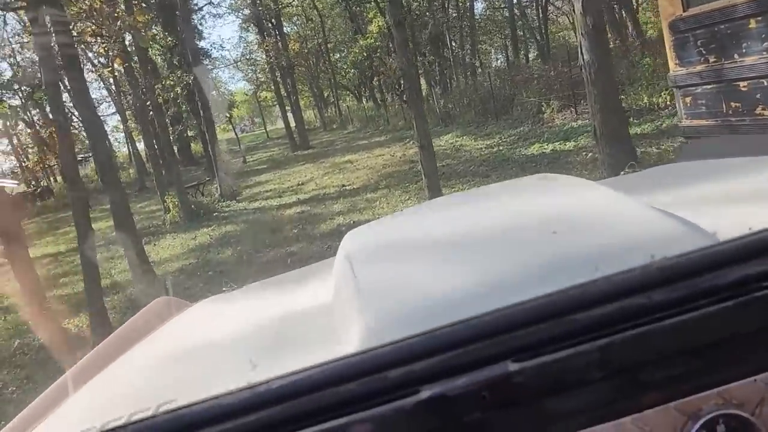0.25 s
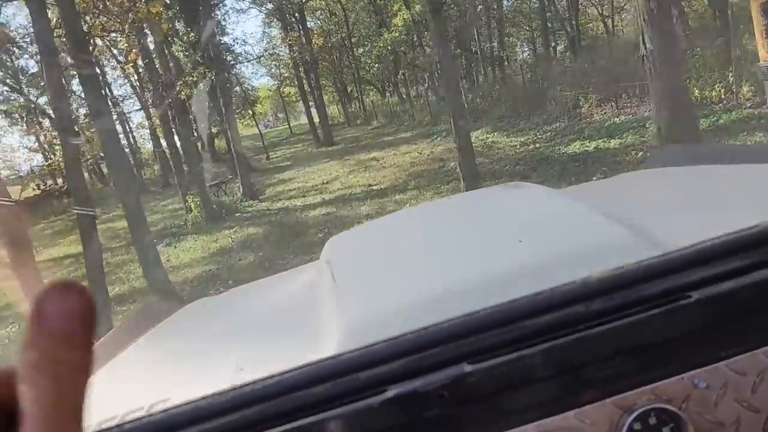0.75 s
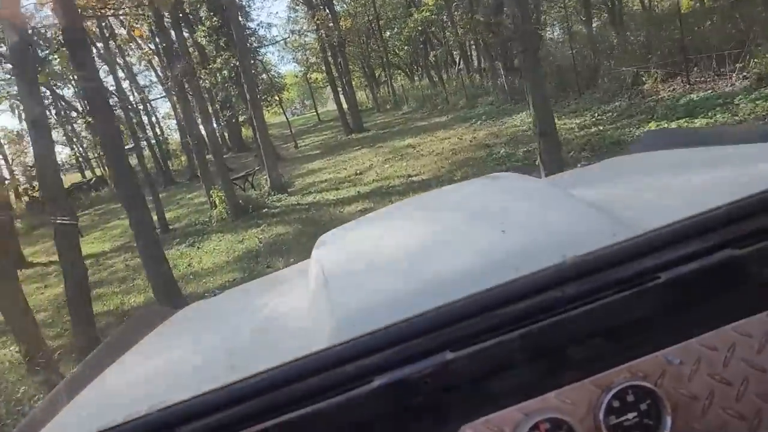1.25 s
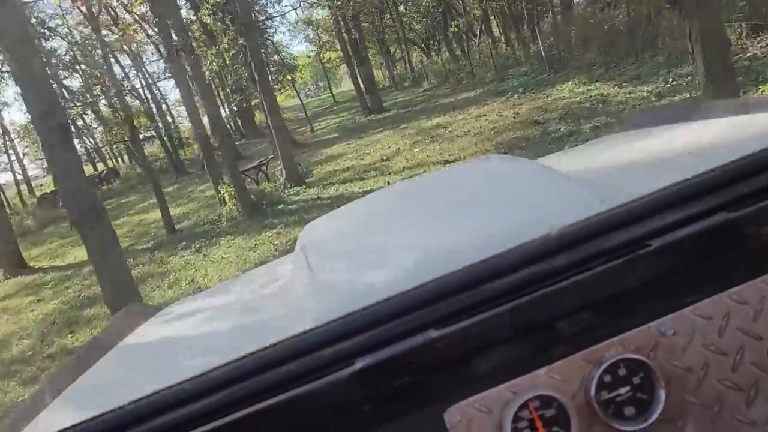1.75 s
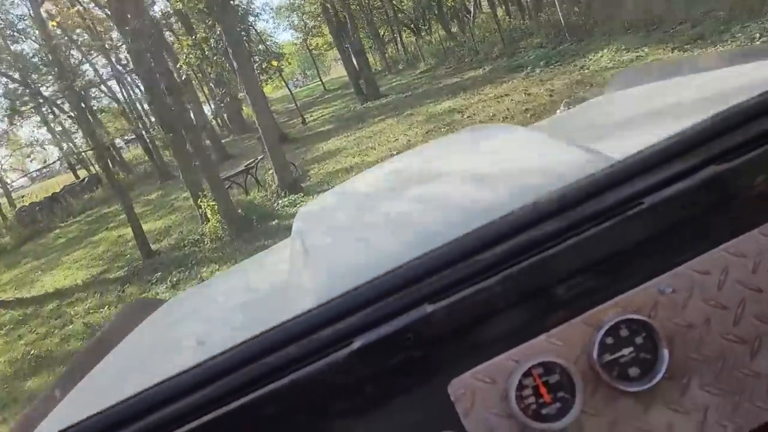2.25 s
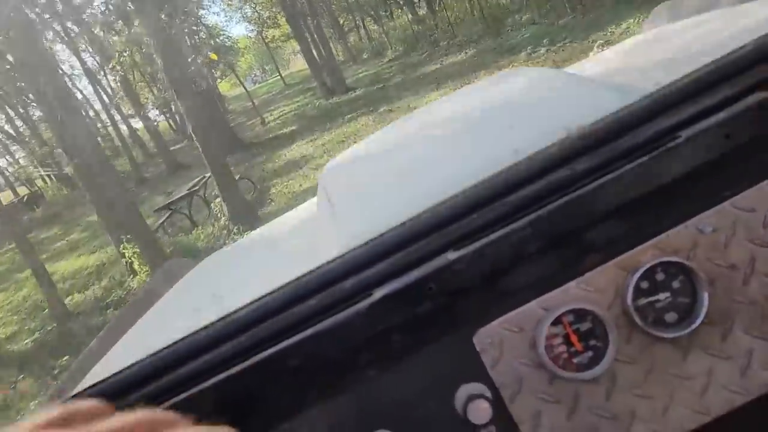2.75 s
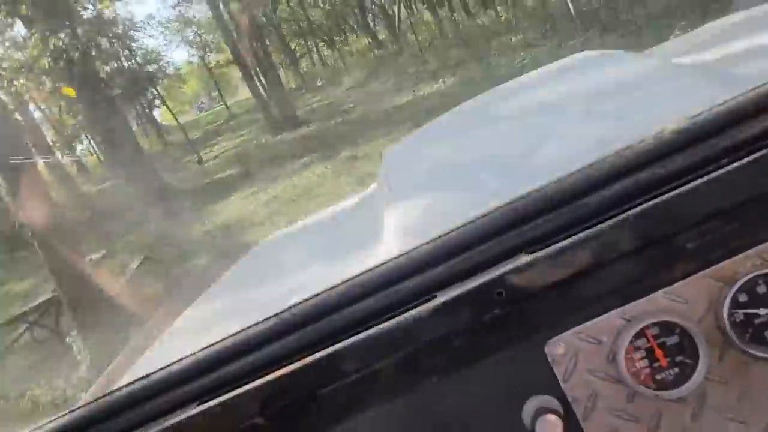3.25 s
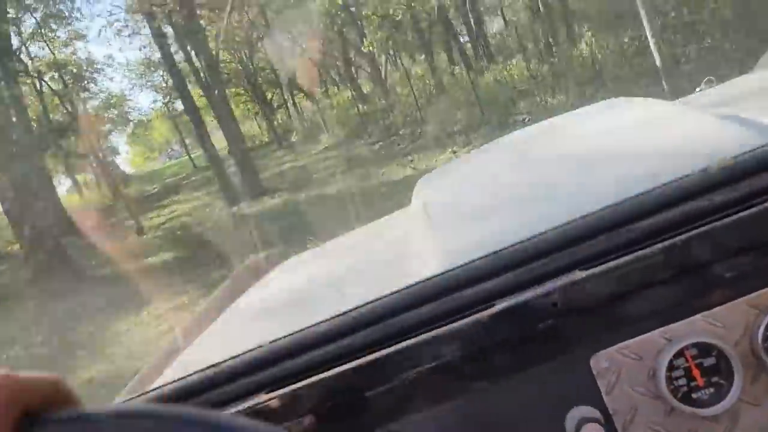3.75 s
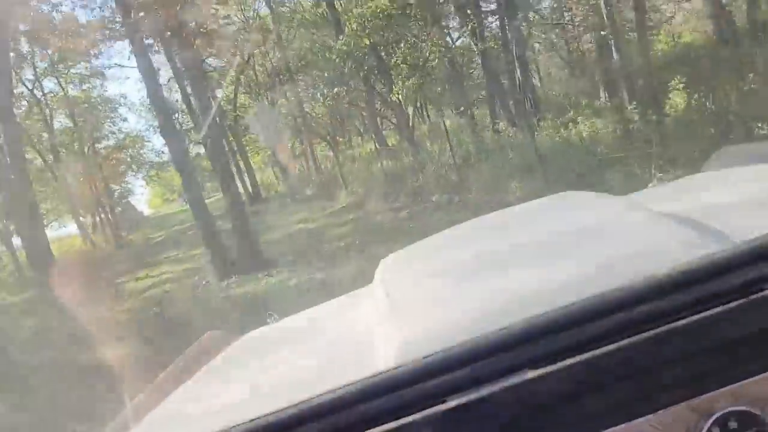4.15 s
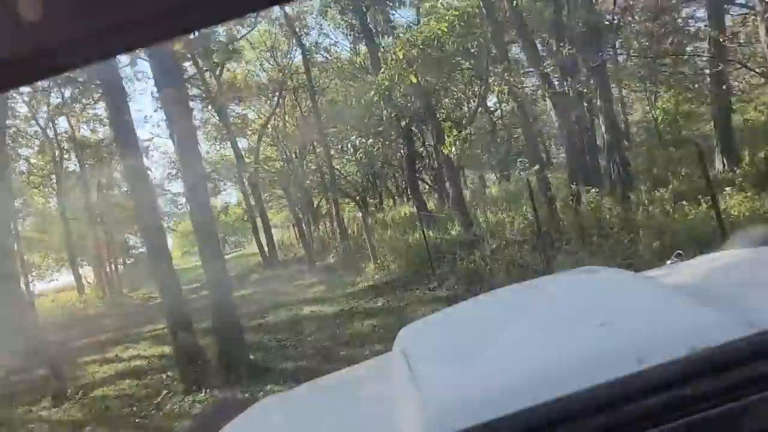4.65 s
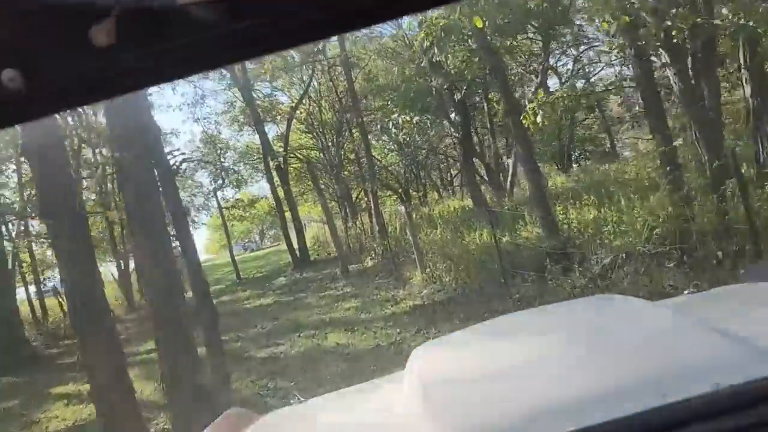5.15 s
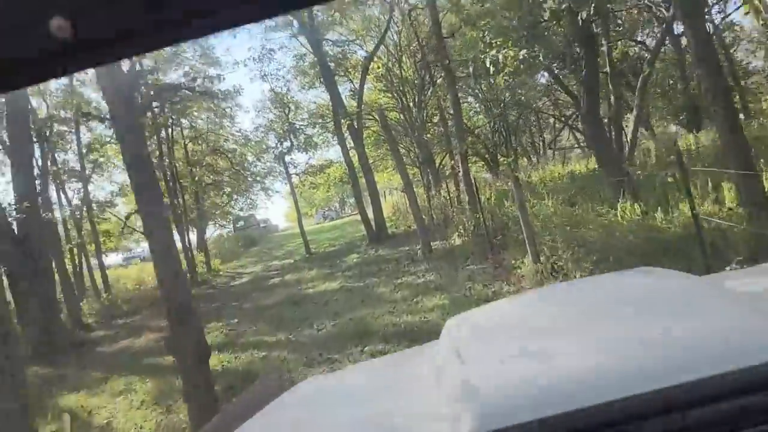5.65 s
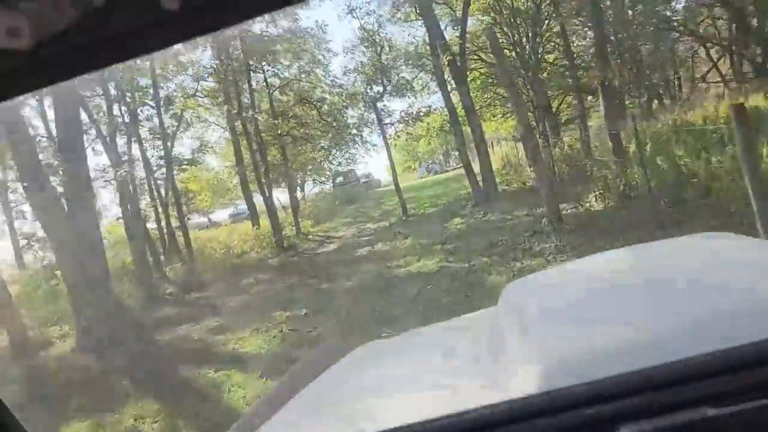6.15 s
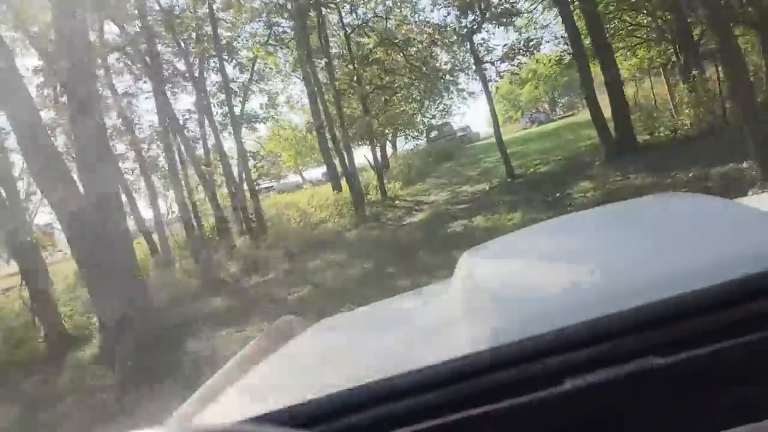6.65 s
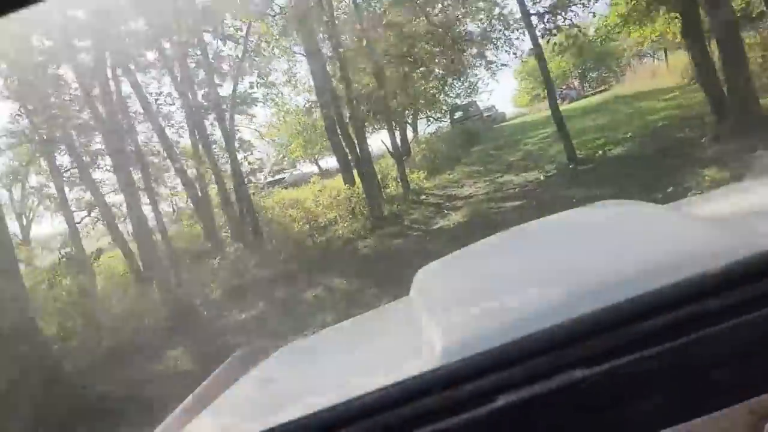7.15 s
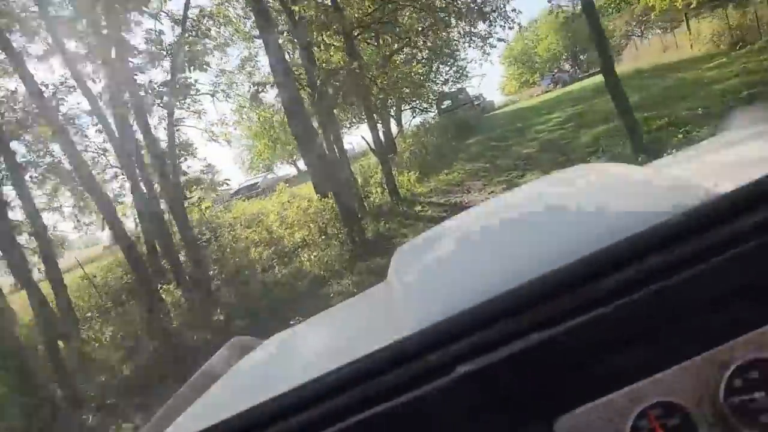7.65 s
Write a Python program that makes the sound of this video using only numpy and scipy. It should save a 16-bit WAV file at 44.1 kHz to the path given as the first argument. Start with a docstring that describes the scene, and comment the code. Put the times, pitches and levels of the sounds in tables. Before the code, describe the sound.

A V8 pickup is heard from inside the cab, crawling over rough ground. The engine rises from low revs in the first half second to a deep, steady boom with a burbling exhaust, fan hiss and light metal ticks. From about 2.4 seconds it revs harder, roaring over a bump with rumble and clatter, and peaks near 3.2 seconds. The throttle shuts at 3.4 and the pitch falls, with a brief squeaky scrape and dry snaps around 3.8. From 4 to 5.5 seconds the engine lopes and putts more quietly while panels knock and creak. At 5.5 it picks up sharply and booms under load at moderate revs until the end, near 8 seconds. Sharp knocks come around 5.9, heavier bumps and rattles between 6.2 and 6.7, and more clatter around 7.6, with a faint jingle of loose metal.

```python
"""V8 pickup on rough ground

From inside the cab, the firing tone booms and the uneven exhaust of the two banks burbles around it.
The engine bay roars and hisses with load; off throttle the engine putts. As the truck crawls along,
panels knock, snap, creak and clatter, small metal parts tick and jingle, and something scrapes once."""
import sys
import numpy as np
from scipy import signal
from scipy.fft import rfft, irfft
from scipy.io import wavfile
from scipy.ndimage import uniform_filter1d

SR = 44100
rng = np.random.default_rng(int(sys.argv[2]) if len(sys.argv) > 2 else 0)


def dump_mix(stems):
    """Bounce the given channels to the path in sys.argv[1] as a 16-bit WAV at rate SR."""
    frames = np.atleast_2d(stems).T  # one column per channel
    limited = np.clip(frames, -1, 1)  # hard clip at full scale
    pcm = np.round(limited * 32767).astype(np.int16)
    wavfile.write(sys.argv[1], SR, pcm)


N = 349272

# the revs: (time [s], firing rate [Hz])
FIRING_RATE = [(0.0, 53), (0.1, 52), (0.225, 62.6), (0.45, 79.7), (0.6, 85.3), (0.75, 84.9), (0.9, 80.7),
               (1.2, 80.3), (1.35, 81.4), (1.65, 81.4), (1.8, 83.3), (2.1, 91.6), (2.25, 92.7), (2.4, 95.8),
               (2.475, 99.9), (2.7, 122.7), (2.85, 132.2), (3.0, 137.7), (3.15, 151.5), (3.225, 154.5),
               (3.375, 150.0), (3.45, 144.1), (3.6, 123.5), (4.0, 60.0), (4.8, 60.5), (5.05, 58.2),
               (5.4, 59.8), (5.5, 63.9), (5.6, 73.5), (5.7, 89.4), (6.02, 93.0), (6.2, 93.8), (6.42, 95.9),
               (6.74, 93.2), (6.98, 83.7), (7.22, 87.2), (7.34, 92.6), (7.58, 94.8), (7.75, 93.3),
               (7.92, 93.2)]
# exhaust faders: (time [s], firing tone [dB], burble [dB])
EXHAUST_LEVELS = [(0.0, -20, -23.5), (0.2, -16.5, -18.5), (0.4, -14.5, -17), (0.78, -14, -23.5),
                  (0.95, -16.5, -20.5), (1.55, -16, -19), (1.8, -15.5, -28.5), (2.38, -14, -31),
                  (2.5, -15, -21.5), (2.7, -17, -15.5), (2.82, -21.5, -14), (2.9, -47, -13),
                  (2.96, -48, -14.5), (3.03, -20.5, -12.5), (3.12, -21.5, -13), (3.345, -22.5, -14),
                  (3.38, -30, -23), (3.54, -24, -18.5), (3.62, -29, -23.5), (3.75, -31.5, -26.5),
                  (3.9, -36.5, -35), (4.3, -35, -40.5), (4.6, -66, -41), (4.88, -30, -28),
                  (5.1, -40, -26.5), (5.25, -42, -30.5), (5.498, -36, -32), (5.512, -15, -26.5),
                  (5.59, -14, -26.5), (5.63, -20.5, -41), (5.66, -10.5, -31), (5.76, -16.5, -32),
                  (5.84, -13, -40), (6.0, -13.5, -33), (6.4, -13.5, -33), (6.7, -15, -25.5),
                  (6.94, -17.5, -36), (7.04, -24.5, -33), (7.12, -14, -39), (7.25, -17.5, -37),
                  (7.4, -14, -46), (7.92, -15.5, -32)]
# partials of the uneven banks: (order [multiple of the eight-cylinder cycle rate], level [dB])
BURBLE_ORDERS = [(3, -1), (4, -3), (5, 2), (6, -9), (7, -11), (9, -10), (10, -6), (11, -1), (12, -7),
                 (13, 3.5), (14, -11), (15, -14), (17, -13), (18, -3), (19, -11), (20, -15), (21, -15),
                 (26, -9), (28, -19), (29, -5), (30, -9), (32, -8)]
# how pipes and cab pass the burble: (frequency [Hz], gain [dB])
CAB_EQ = [(25, -68), (55, -19), (85, -10.5), (100, -4), (113, -4), (132, -25), (145, -16), (160, -22),
          (182, -28), (205, -20), (250, -13.5), (300, -15), (350, -13), (400, -22), (650, -65)]
# the firing tone's octave against the burble: (frequency [Hz], gain [dB])
OCTAVE_EQ = [(105, 1), (125, -4.5), (160, -32), (180, -21), (195, -7.5), (250, -10), (310, -16)]
# gas flow in the pipes: (frequency [Hz], density [dB])
RASP_SPECTRUM = [(150, -17), (200, -13.5), (260, 10.5), (340, -7), (390, -5), (800, -21), (1000, -45)]
# cab air stirred by the firing tone: (frequency [Hz], density [dB])
BOOM_SPECTRUM = [(95, -30), (108, 0), (122, 0), (135, -10), (160, -30)]
# lone strong firings off throttle: (time [s], level [dB], pitch [Hz], swell time [s])
PUTTS = [(3.461, -32, 123, 0.01), (3.5, -23, 65, 0.019), (3.549, -13, 112, 0.011), (3.82, -18, 109, 0.004),
         (3.901, -16, 81.5, 0.01), (4.239, -20.5, 74.4, 0.0047), (4.455, -20.5, 87, 0.012),
         (4.479, -38, 87, 0.0067), (4.497, -17.5, 82.4, 0.0074), (4.577, -25, 90, 0.007),
         (4.627, -17, 87, 0.0082), (4.683, -20.5, 87, 0.0079), (4.714, -18, 87, 0.007),
         (4.755, -18, 74.6, 0.014), (4.815, -18, 90, 0.011), (4.846, -16, 84, 0.0073),
         (4.875, -17.5, 75, 0.008), (4.899, -13, 87, 0.0078), (4.928, -19, 62.7, 0.011),
         (4.95, -16, 79.6, 0.008), (4.98, -17, 86, 0.007), (5.033, -10.5, 80, 0.0062),
         (5.063, -13, 65, 0.0076), (5.082, -14.5, 62, 0.0099), (5.116, -13.5, 75.5, 0.0064),
         (5.174, -14, 95, 0.0043), (5.232, -23, 75, 0.0089), (5.251, -16.5, 86, 0.0089),
         (5.281, -9.5, 80, 0.005), (5.387, -12.5, 72, 0.0071), (5.424, -17, 80, 0.006),
         (5.444, -20, 74.6, 0.011), (5.51, -42, 70, 0.009)]
# deep shake of the chassis: (frequency [Hz], density [dB])
SHAKE_SPECTRUM = [(15, -25), (30, -2), (55, 8), (95, 15), (125, -10), (160, -10), (200, -32)]
# low-mid chassis rumble: (frequency [Hz], density [dB])
RUMBLE_SPECTRUM = [(110, -6.5), (150, 2), (180, 2.5), (240, -5), (310, -5), (400, -12), (520, -31)]
# bumps in the ground: (time [s], hold [s], chassis rumble [dB], panel clatter [dB])
BUMPS = [(0.67, 0.11, -31, -47), (1.142, 0.018, -43, -39), (1.997, 0.018, -46, -38),
         (2.13, 0.018, -52, -35), (2.44, 0.34, -28, -31.5), (3.456, 0.12, -33, -38.5),
         (3.584, 0.11, -33, -40), (3.735, 0.072, -35.5, -36), (4.097, 0.033, -39, -41),
         (4.32, 0.075, -38, -45), (4.5, 0.093, -38, -43), (4.732, 0.015, -62, -36.5),
         (4.813, 0.059, -31.5, -40.5), (5.027, 0.14, -33.5, -45), (5.273, 0.042, -32.5, -47),
         (5.502, 0.025, -51, -39), (5.916, 0.047, -47, -37), (6, 0.054, -53, -42), (6.11, 0.035, -69, -37),
         (6.2, 0.037, -31, -45), (6.27, 0.13, -27, -32.5), (6.568, 0.075, -28, -33),
         (6.974, 0.15, -38, -63), (7.355, 0.039, -103, -35.5), (7.515, 0.068, -44, -35.5),
         (7.597, 0.028, -60, -35.5), (7.686, 0.013, -59, -30), (7.77, 0.015, -46, -33.5),
         (7.847, 0.034, -57, -39)]
# engine bay fader, set by the fan hiss: (time [s], level [dB])
BAY_LEVEL = [(0, -49.5), (.15, -41), (.5, -38.5), (.9, -42.5), (1.7, -43), (2.4, -41), (2.47, -39.5),
             (2.65, -38), (3.4, -37), (3.47, -44.5), (3.6, -45.5), (4.3, -48.5), (4.83, -48.5),
             (5.18, -47.5), (5.49, -44.5), (5.62, -40), (5.98, -39), (6.35, -41.5), (6.79, -44.5),
             (7.1, -44.5), (7.5, -42.5), (7.92, -43.5)]
# engine bay roar: (frequency [Hz], density [dB])
ROAR_SPECTRUM = [(220, -16), (380, -4.5), (480, -1.5), (690, -1.5), (770, -7.5), (845, -3.5), (950, -9),
                 (1065, -2), (1150, -10), (1260, -6), (1480, -7), (1810, -8.5), (2070, -10.5),
                 (2500, -16.5), (3250, -61)]
# fan hiss: (frequency [Hz], density [dB])
HISS_SPECTRUM = [(1290, -5.5), (2200, 0), (2570, -4.5), (2750, -2.5), (3150, 0.5), (3700, -3), (5030, -3.5),
                 (6350, -2.5), (6890, -3.5), (7490, -2.5), (10000, -5.5), (12600, -8), (15100, -11.5),
                 (15900, 14)]
# intake air: (frequency [Hz], density [dB])
INTAKE_SPECTRUM = [(7000, -22), (10000, -8.5), (12300, -4), (14000, -7), (16000, -14)]
# panel knocks: (time [s], level [dB], pan left minus right [dB], brightness [dB/octave])
KNOCKS = [(1.655, -21, 12, -11), (1.996, -16.5, 8, 3.5), (2.384, -24, 4, 4), (2.433, -25, 9, 6),
          (2.803, -17, -8, -8), (3.636, -28, -9, 0), (3.779, -16, -4, -3), (3.819, -20, 2, -10),
          (3.91, -27, -5, 2), (4.069, -18, 9, -3), (4.279, -18, -4, -6), (4.412, -22.5, -16, -2),
          (4.539, -21, -10, 0), (4.826, -24, -6, 2), (4.84, -26, -8, 3), (4.946, -33, 4, -6),
          (5.047, -20, 1, -14), (5.895, -15, 3, 5), (5.906, -17.5, 1, 3), (6.109, -35, -2, -4),
          (6.267, -27, -11, 3), (6.299, -34, -17, 9), (6.351, -20, 4, -4), (6.382, -22, 24, -8),
          (6.439, -23, 20, 3.5), (6.499, -24, 21, -2), (6.579, -21, -1, -2), (6.599, -17, -7, -3),
          (6.644, -24, 12, -6), (7.046, -25, -10, -4), (7.13, -22, -6, 5), (7.231, -28, 10, -18.5),
          (7.26, -27, 0, 8.5), (7.35, -25, -4, 6), (7.473, -35, 9, 1), (7.62, -33, -7, 3),
          (7.635, -15, 12, 4), (7.678, -29, 8, -2), (7.693, -21, 6, 0), (7.76, -31, -2, -5)]
# panel resonances: (frequency [Hz], level [dB], T60 [s])
PANEL_MODES = [(168, -16.5, 0.041), (373, -4.5, 0.033), (435, -5.5, 0.13), (550, 2.5, 0.051),
               (690, -11, 0.03), (885, 0, 0.016), (1050, 6, 0.004), (1320, 2, 0.015), (1600, 3, .008),
               (1970, 1.5, 0.0073), (2400, -6, .005), (3000, -3, 0.0064), (4470, -24, .004)]
# trim snaps: (time [s], level [dB], pan [dB], pitch [Hz])
SNAPS = [(3.779, -19, -6, 800), (3.793, -24, -2, 800), (3.8186, -15, -1, 600), (4.069, -27, 5, 900),
         (4.279, -26, -3, 1100), (6.267, -21, -4, 800), (6.446, -25, 0, 1100), (6.646, -21, 9, 700),
         (6.998, -26, -5, 1000), (7.009, -27, -5, 1200), (7.047, -25, -7, 1000), (7.233, -26, 5, 600),
         (7.637, -21, 5, 1600), (7.692, -24, 4, 1000)]
# panel creaks: (time [s], length [s], level [dB], pitch [Hz])
CREAKS = [(1.982, 0.034, -25, 527), (2.139, .04, -27, 506), (3.579, 0.043, -26, 694),
          (3.665, 0.039, -29, 706), (3.91, 0.024, -27, 515), (4.068, 0.0084, -29, 516),
          (4.537, .03, -30, 370), (4.849, .03, -25, 382), (4.876, 0.022, -26, 368), (4.943, .015, -31, 350),
          (5.045, 0.011, -26, 380), (5.158, .02, -31, 300), (5.194, .03, -27, 385),
          (5.342, 0.017, -26.5, 380), (5.898, 0.025, -20, 685), (6.157, 0.055, -26.5, 613),
          (6.574, 0.045, -26.5, 690), (7.355, 0.049, -44, 660), (7.59, 0.043, -31, 650),
          (7.684, 0.02, -26, 663), (7.764, 0.033, -32, 656), (7.844, .03, -34, 606)]
# metal ticks: (time [s], level [dB], pitch [Hz], pan [dB], ringing share [0-1])
TICKS = [(0.0409, -34, 10900, 15, 0), (0.198, -26, 11900, 2, 0.1), (0.236, -36, 5450, 8, 0.4),
         (0.2769, -30, 12000, 3, 0), (0.3228, -27, 12900, -2, 0), (0.62, -23, 12500, -3, 0),
         (0.85, -28, 13100, -12, 0), (1.4028, -28, 12000, -5, 0), (1.6607, -28, 12000, 6, 0),
         (1.7959, -30, 12000, 13, 0), (0.2053, -31, 5500, -9, 0.56), (0.199, -32, 7740, 0, .4),
         (0.3225, -32, 8300, -7, 0.4), (0.3235, -32, 7500, 0, .4), (0.213, -37, 5750, -10, 0.4),
         (0.222, -38, 5700, -17, 0.5), (0.325, -38, 6230, -8, 0.55), (0.3694, -35, 6580, -13, 0.3),
         (0.414, -27, 7950, 4, 0.27), (0.434, -32, 6600, 7, 0.3), (0.6244, -27, 7440, -9, 0.3),
         (0.6444, -35, 8450, -14, 0.35), (0.7039, -29, 12600, -5, 0), (0.7154, -29, 7850, 7, 0.4),
         (0.795, -28, 8700, -10, 0.3), (1.1065, -31, 6600, -8, 0.2), (1.5985, -33, 6800, -18, 0.34),
         (1.6836, -29, 8150, -10, 0.22), (1.9125, -30, 8500, 8, 0.1), (2.51, -19, 5630, 5, 0.07),
         (3.604, -29.5, 9560, -11, 0), (3.9048, -31, 11400, 10, 0), (4.0441, -42, 6100, 26, 0.1),
         (4.176, -28, 5020, 4, 0.13), (4.6663, -43, 6200, -14, 0.2), (4.9519, -52, 4740, -8, 0.4),
         (5.629, -28, 6300, -10, 0.22), (5.815, -31, 7600, -4, 0.4), (5.86, -31, 8000, 2, 0.3),
         (5.99, -35, 7550, -5, 0.45), (6.0094, -48, 13400, -19, 0.15), (6.1644, -32, 5660, 2, 0.45),
         (6.33, -41, 7300, -5, 0.7), (6.94, -40, 5600, -27, 0.27), (6.995, -36, 6660, -34, 0.05),
         (6.9965, -34, 12500, -18, 0.1), (7.3022, -32, 5230, -19, 0.1), (7.636, -29, 2800, 4, 0)]
# envelope of the scrape: (time [s], level [dB], treble shelf [dB])
SCRAPE_LEVELS = [(3.727, -99, 0), (3.73, -28, 0), (3.742, -22.5, 0), (3.753, -25, 0), (3.758, -30, -5),
                 (3.771, -33.5, -8), (3.774, -39, -4), (3.8, -42, -3), (3.81, -74, 0)]
# colour of the scrape: (frequency [Hz], density [dB])
SCRAPE_SPECTRUM = [(900, -10), (1200, -15), (1330, 2.5), (1600, -28), (1900, -7), (2300, -19.5),
                   (2900, -14), (5000, -16), (8000, -21), (13000, -23), (16000, -22)]
# squeak of the scraped part: (time [s], level [dB], pitch [Hz])
SQUEAK = [(3.726, -99, 1330), (3.728, -28, 1330), (3.744, -26, 1350), (3.75, -31, 1500), (3.76, -35, 1600),
          (3.771, -41, 1500), (3.775, -99, 1500)]
# fader for the jingling parts: (time [s], level [dB])
JINGLE_LEVEL = [(0, -57), (.2, -54), (.6, -46.5), (.9, -47), (2.0, -50.5), (2.4, -73), (3.3, -49),
                (4.5, -83), (5.7, -55), (6.6, -49), (7.2, -95), (7.92, -50)]
# where the hiss sings: (centre [Hz], width [Hz], gain [dB])
SINGING_BANDS = [(1075, 38, -17.5), (1217, 68, -11.5), (2887, 260, -11), (842, 20, -9.5), (5570, 90, -25),
                 (6320, 430, -13.5), (7320, 120, -15.5), (11600, 250, -16), (12950, 350, -16.5)]
# stereo image of noise in the cab: (frequency [Hz], left-right correlation [-1 to 1])
CAB_IMAGE = [(60, 0.52), (110, 1), (170, 0.86), (380, 0.65), (800, 0.81), (1170, 0.51), (2380, -0.074),
             (5980, -0.16), (15000, -0.084)]
# the roar reaches each side by its own path: (frequency [Hz], left-right correlation [-1 to 1])
ROAR_IMAGE = [(220, 0.39), (420, 0.95), (600, 0.5), (800, 0.54), (1050, 0.041), (1400, -0.089),
              (1900, -0.059), (3250, 0.19)]
# balance of noise in the cab: (frequency [Hz], pan [dB])
CAB_PAN = [(60, -0.3), (110, -1), (180, -0.5), (400, 0), (600, -1.5), (800, -1), (1050, -3), (1400, -3.5),
           (1900, -4.5), (2700, -1.5), (4970, -1.5), (8000, -3.5), (15000, -3.0)]

THROTTLE_SHUT_S, THROTTLE_OPEN_S = 3.36, 5.5
STEP = 16   # samples between points of the low tones and bump envelopes


def exhaust(firing_hz, crank, tone_db, burble_db, shut):
    """Sines locked to the crank: the firing tone, two overtones and the burble of the uneven banks."""
    octave_db = db_sum(burble_db + at_hz(OCTAVE_EQ, 2 * firing_hz) - 5.5 * shut, tone_db - 35.5)
    partials = [(8, tone_db + .89 * drift(24)),
                (16, octave_db + .5 * drift(39)),
                (24, tone_db - 34 + 4.2 * drift(18))]
    for order, level_db in BURBLE_ORDERS:   # no two cycles burn alike, so each order wanders
        cab_db = at_hz(CAB_EQ, firing_hz * order / 8)
        partials.append((order, burble_db + level_db + cab_db + .8 * drift(4)))
    out = 0
    for order, level_db in partials:
        wide = order != 8   # the firing tone stays near the centre
        spread = .05 + wide * (.15 + .07 * rng.standard_normal())
        phase = order * crank[::STEP] + rng.uniform(0, 2 * np.pi) + [[-spread], [spread]]
        out += np.sqrt(2) * from_db(level_db[::STEP]) * pan(-1.3 * wide) * np.sin(phase)
    return signal.resample_poly(out, STEP, 1, axis=1)[:, :N] * pan(-.5)


def exhaust_air(crank, tone_db, burble_db):
    """Each firing pushes a rasp of gas down the pipes, and the firing tone sets the cab air booming."""
    rasp = from_db(burble_db - 21 + .5 * np.cos(8 * crank)) * coloured(RASP_SPECTRUM)
    boom = from_db(tone_db - 20.5 + 2 * drift(5)) * coloured(BOOM_SPECTRUM)
    return rasp + boom


def putts():
    """A lone firing thumps the cab air: a dip, a crest and a dying swing."""
    out, age = np.zeros(N + SR), np.arange(SR // 5) / SR
    for time, level_db, hz, swell_s in PUTTS:
        swell = age / swell_s * np.exp(1 - age / swell_s)
        start = int((time - .75 / hz) * SR)   # the crest lands on the cue
        out[start:start + len(age)] -= from_db(level_db) * swell * np.sin(2 * np.pi * hz * age)
    return np.stack([np.roll(out, 7)[:N], out[:N]])   # the right side hears it first


def chassis(rumble_db, shut):
    """The chassis rumbles over a deep shake that eases off throttle."""
    shake_db = follow(rumble_db, mean_db=-38, ratio=.91) - 4 * shut
    shake = from_db(shake_db + .53 * drift(27)) * coloured(SHAKE_SPECTRUM)
    return shake + from_db(rumble_db + .88 * drift(44)) * coloured(RUMBLE_SPECTRUM)


def bumps():
    """Chassis and panel envelopes in dB: each bump in the ground hits fast, holds and dies away."""
    attack_db_per_s, release_db_per_s = 595, 340
    t, rumble_db, clatter_db = np.arange(0, N, STEP) / SR, -99., -99.
    for time, hold, chassis_db, panel_db in BUMPS:
        shape_db = -attack_db_per_s * np.maximum(time - t, 0)
        shape_db -= release_db_per_s * np.maximum(t - time - hold, 0)
        rumble_db = np.maximum(rumble_db, chassis_db + shape_db)
        clatter_db = np.maximum(clatter_db, panel_db + shape_db)
    return in_time(np.column_stack([t, rumble_db, clatter_db]))


def engine_bay(firing_hz, crank, bay_db):
    """Roar and fan hiss throb with each firing and flutter together; intake rush grows with the revs."""
    throb, flutter_db = np.cos(8 * crank), .5 * drift(23)
    roar_db = follow(bay_db, mean_db=-40, ratio=1) + flutter_db + 1.8 * drift(17) + .95 * throb
    roar = from_db(roar_db) * coloured(ROAR_SPECTRUM, ROAR_IMAGE)
    hiss = from_db(bay_db + flutter_db + 1.25 * drift(41) + .44 * throb) * coloured(HISS_SPECTRUM)
    intake_db = bay_db - 10 + 7.2 * np.log2(firing_hz / 90) + 2.7 * drift(43)
    return roar + hiss + from_db(intake_db) * coloured(INTAKE_SPECTRUM)


def knocks():
    """Soft-edged knocks: each panel mode swells briefly, then rings out; bright ones reach high modes."""
    swell_s = .002
    times, knock_db, pan_db, brightness = np.transpose(KNOCKS)
    scatter_db = rng.normal(0, 3, (len(times), len(PANEL_MODES)))
    out, age = 0, np.arange(int(3 * swell_s * SR)) / SR
    for k, (hz, mode_db, t60) in enumerate(PANEL_MODES):
        onset = (.5 + rng.random(len(age))) * np.cos(2 * np.pi * hz * age) * np.exp(-age / swell_s)
        onset /= np.abs(onset @ np.exp(2j * np.pi * hz * age))   # unity gain at the mode
        level_db = knock_db - 15.5 + mode_db + scatter_db[:, k] + brightness * np.log2(hz / 690)
        drive = signal.oaconvolve(clicks(times, level_db, pan_db), [onset])[:, :N]
        out += ring(drive, hz, t60)
    return out


def snaps():
    """The trim gives a dry snap, dead within a few swings."""
    return sum(ring(clicks([time], level_db, pan_db), hz, t60=4.5 / hz)
               for time, level_db, pan_db, hz in SNAPS)


def creaks():
    """Uneven slips, faded in and out, keep one panel mode ringing."""
    out, age = np.zeros(N + SR), np.arange(SR // 5) / SR
    for time, length, level_db, hz in CREAKS:
        fade = np.sin(np.pi * np.minimum(age / length, 1)) ** .5
        creak = ring(rng.standard_normal(len(age)) * fade, hz, t60=.025)
        start = int(time * SR)
        out[start:start + len(age)] += from_db(level_db) * creak / np.abs(creak).max()
    return out[:N] * pan(2)


def clatter(level_db):
    """Loose panels chatter in the mids, with lighter trim rattling above them."""
    panels = chatter(per_s=500, low_hz=498, high_hz=826, t60=.021, tilt_db=-1.5, bleed=.19)
    trim = chatter(per_s=250, low_hz=938, high_hz=2580, t60=.016, tilt_db=-7, bleed=-.12)
    return from_db(level_db) * (panels + from_db(-7.5) * pan(-4) * trim)


def ticks():
    """Small metal parts touch with a dry crack; the freer the part, the louder and longer it rings."""
    out, age = np.zeros((2, N + SR)), np.arange(SR // 12) / SR
    noise = rng.standard_normal((len(TICKS), len(age)))
    cracks = rms_one(uniform_filter1d(noise, size=7))   # about 3 kHz to each side of the pitch
    wobbles = rms_one(uniform_filter1d(noise, size=45))   # further touches break up the ring
    for (time, level_db, hz, pan_db, share), crack, wobble in zip(TICKS, cracks, wobbles):
        attack = (1 - share) * .39 * crack * np.exp(-age / .0069)
        tail = share * (1 + .7 * wobble) * np.exp(-age / (.03 * share + .002))
        tick = (attack + tail) * np.sin(2 * np.pi * hz * age)
        start = int(time * SR)
        out[:, start:start + len(age)] += from_db(level_db) * pan(pan_db) * tick
    return out[:, :N]


def scrape():
    """Gritty rubbing dulls as it ends, with a squeak that wavers differently on each side."""
    level_db, shelf_db = in_time(SCRAPE_LEVELS)
    squeak_db, squeak_hz = in_time(SQUEAK)
    wavering_hz = squeak_hz * (1 + .03 * np.array([drift(150), drift(150)]))
    squeak = np.sin(2 * np.pi * np.cumsum(wavering_hz, axis=1) / SR + [[0], [2]])
    rub = coloured(SCRAPE_SPECTRUM)
    treble = signal.sosfiltfilt(signal.butter(3, 3800, "high", fs=SR, output="sos"), rub)
    rub = from_db(level_db + 1.5 * drift(220)) * (rub + (from_db(shelf_db) - 1) * treble)
    return rub + np.sqrt(2) * from_db(squeak_db + 1.5 * drift(200)) * squeak * pan(-3)


def jingle():
    """Loose metal parts touch in a faint, bright shimmer."""
    level_db, = in_time(JINGLE_LEVEL)
    return from_db(level_db) * pan(-3) * chatter(per_s=700, low_hz=5400, high_hz=8600, t60=.03)


def singing(bay_db):
    """Narrow bands sing in the hiss, each swelling and fading on its own."""
    out, white = 0, rng.standard_normal((2, N))
    for hz, width_hz, gain_db in SINGING_BANDS:
        band = signal.lfilter(*signal.iirpeak(hz, hz / width_hz, fs=SR), white)
        out += from_db(gain_db + 4.3 * np.minimum(drift(15), 1.2)) * rms_one(band)
    return from_db(follow(bay_db, bay_db.mean(), ratio=1.5)) * out * pan(-3)


def chatter(per_s, low_hz, high_hz, t60, tilt_db=0, bleed=0):
    """Clumps of random touches each ring one of 20 modes, laid out left and right in turn; rms 1."""
    touches = rng.random(N) < per_s * from_db(4 * drift(12)) / SR
    hits = touches * from_db(3 * np.minimum(rng.exponential(1, N), 3))
    out, struck_mode = np.zeros((2, N)), rng.integers(0, 20, N)
    for k, hz in enumerate(np.geomspace(low_hz, high_hz, 20)):
        out[k % 2] += from_db(tilt_db * np.log2(hz / low_hz)) * ring(hits * (struck_mode == k), hz, t60)
    return rms_one(out + bleed * out[::-1])


def coloured(spectrum, image=CAB_IMAGE):
    """Shaped stereo noise with the cab's width and balance; rms 1 in mono."""
    hz = np.maximum(np.fft.rfftfreq(N, 1 / SR), 1)
    mid, side = rfft(rng.standard_normal((2, N)))
    alike, lean = at_hz(image, hz), from_db(at_hz(CAB_PAN, hz) / 2)
    mid, side = mid * np.sqrt(1 + alike), side * np.sqrt(1 - alike)
    left_lag = np.exp(-2j * np.pi * np.minimum(hz, 400) * 1e-4)   # lows arrive 0.1 ms late
    eq = from_db(at_hz(spectrum, hz)) * (hz > spectrum[0][0]) * (hz < spectrum[-1][0])
    pair = irfft(eq * [(mid + side) * lean * left_lag, (mid - side) / lean], N)
    return pair / np.sqrt(np.mean(pair.mean(axis=0) ** 2))


def ring(drive, hz, t60):
    """One mode: a unit click sets off a decaying sine of height 1."""
    r, w = from_db(-60 / (t60 * SR)), 2 * np.pi * hz / SR
    return signal.lfilter([0, np.sin(w)], [1, -2 * r * np.cos(w), r * r], drive + 1e-18)


def clicks(times, level_db, pan_db):
    """A panned click at each time."""
    out = np.zeros((2, N))
    out[:, (np.array(times) * SR).astype(int)] = from_db(level_db) * pan(pan_db)
    return out


def drift(rate_hz):
    """Smooth random modulation from low-passed noise; rms 1."""
    hop, run_in = 40, 2000
    r = np.exp(-2 * np.pi * rate_hz * hop / SR)
    slow = signal.lfilter([1], [1, -2 * r, r * r], rng.standard_normal(N // hop + run_in + 2))[run_in:]
    return np.interp(np.arange(N) / hop, np.arange(len(slow)), rms_one(slow))


def follow(leader_db, mean_db, ratio):
    """A level that rides another, swinging ratio times as far."""
    return mean_db + ratio * (leader_db - leader_db.mean())


def db_sum(*levels_db):
    """Level of unrelated sounds together."""
    return 10 * np.log10(sum(from_db(db) ** 2 for db in levels_db))


def pan(left_minus_right_db):
    return from_db(np.array([[.5], [-.5]]) * left_minus_right_db)


def from_db(db):
    return 10 ** (np.asarray(db) / 20)


def rms_one(x):
    return x / np.sqrt(np.mean(x ** 2) + 1e-20)


def in_time(rows):
    times, *columns = np.transpose(rows)
    return [np.interp(np.arange(N) / SR, times, column) for column in columns]


def at_hz(points, hz):
    points_hz, values = np.transpose(points)
    return np.interp(np.log(hz), np.log(points_hz), values)


def scene():
    """The exhaust sets the chassis and panels going, and the ground adds its bumps."""
    firing_hz, = in_time(FIRING_RATE)
    tone_db, burble_db = in_time(EXHAUST_LEVELS)
    bay_db, = in_time(BAY_LEVEL)
    t = np.arange(N) / SR
    shut = uniform_filter1d(1. * ((t > THROTTLE_SHUT_S) & (t < THROTTLE_OPEN_S)), size=400)
    lope = from_db(shut * np.minimum(drift(25), 1))   # off throttle the firing lopes
    firing_hz *= 1 + .07 * shut * drift(14)   # and the revs hunt
    crank = 2 * np.pi * np.cumsum(firing_hz / 8) / SR   # phase of the eight-cylinder cycle
    air = exhaust_air(crank, tone_db, burble_db)
    engine = lope * (exhaust(firing_hz, crank, tone_db, burble_db, shut) + air) + putts()
    chassis_db, panel_db = bumps()
    rolling_rumble_db, rolling_clatter_db = -42.5, -46   # the bed that the ground alone keeps up
    rumble_db = db_sum(follow(burble_db, mean_db=-48.5, ratio=1.48), rolling_rumble_db, chassis_db)
    clatter_db = db_sum(follow(burble_db, mean_db=-58.5, ratio=1.84), rolling_clatter_db, panel_db)
    rattles = clatter(clatter_db) + jingle()
    bed = chassis(rumble_db, shut) + engine_bay(firing_hz, crank, bay_db)
    accents = knocks() + snaps() + creaks() + ticks() + scrape()
    return engine + bed + accents + rattles + singing(bay_db)


def record(dry):
    """A steep low-pass takes off the very top."""
    return signal.sosfilt(signal.cheby2(16, 70, 16200, fs=SR, output="sos"), dry)


dry = scene()
out = record(dry)
dump_mix(out)
```